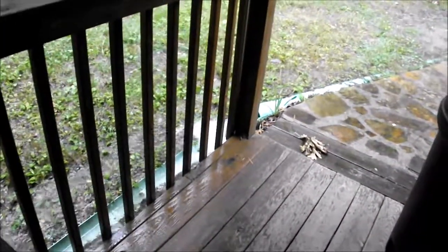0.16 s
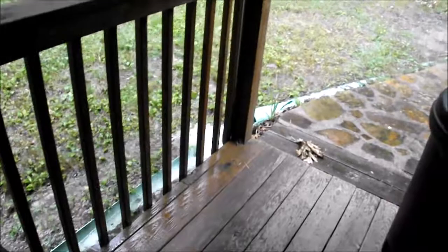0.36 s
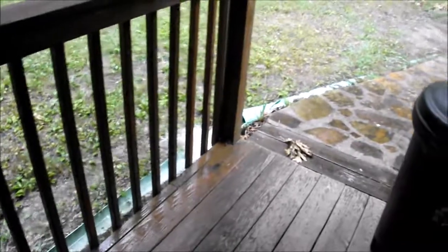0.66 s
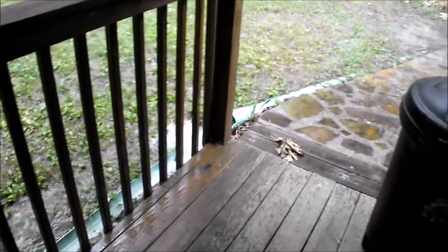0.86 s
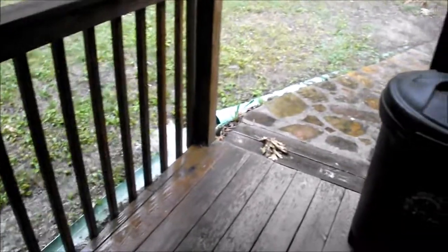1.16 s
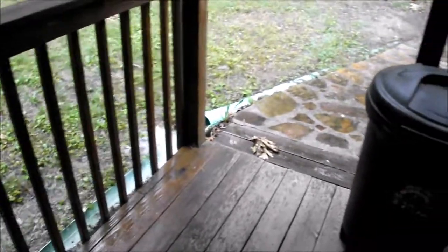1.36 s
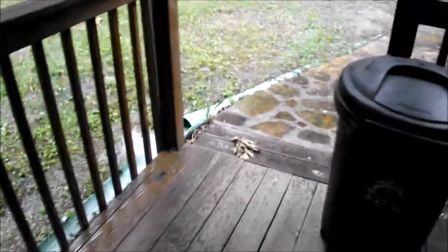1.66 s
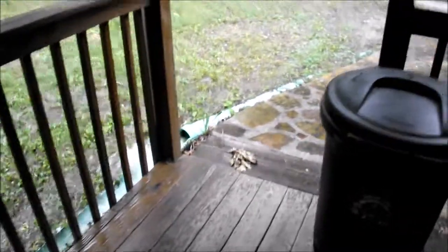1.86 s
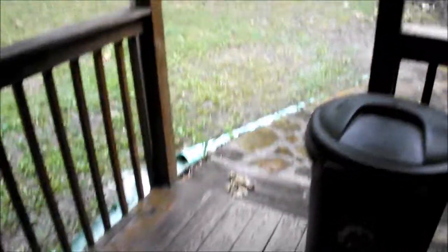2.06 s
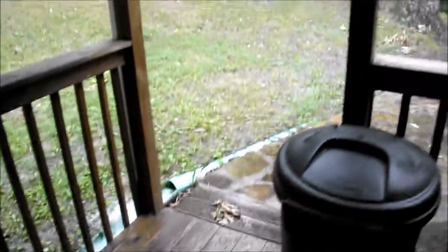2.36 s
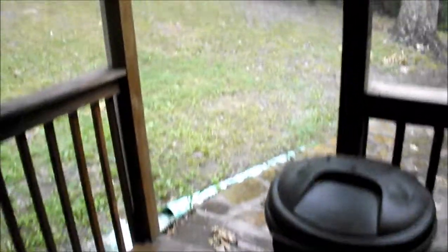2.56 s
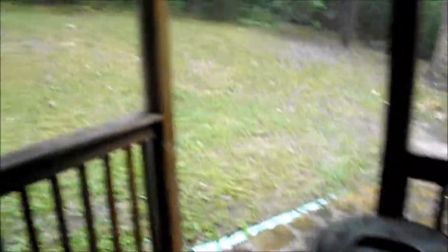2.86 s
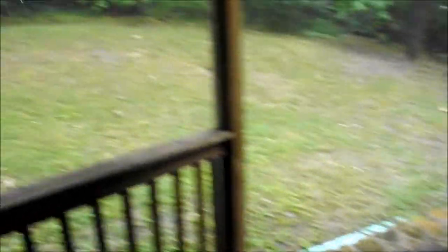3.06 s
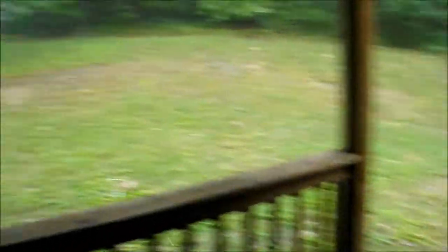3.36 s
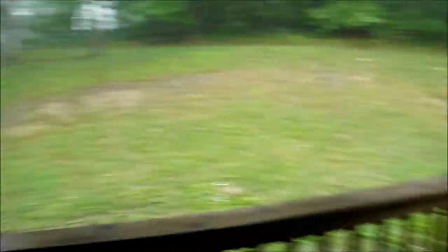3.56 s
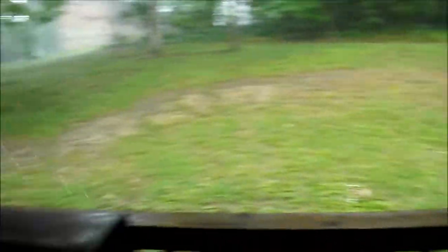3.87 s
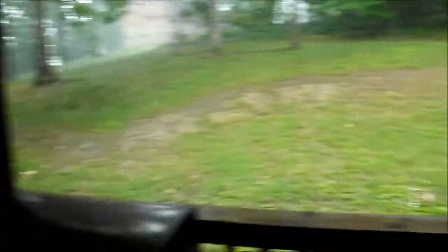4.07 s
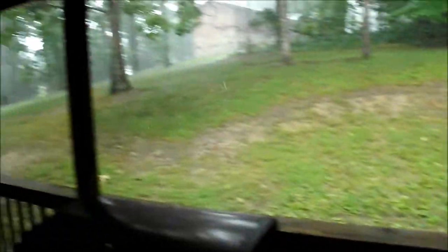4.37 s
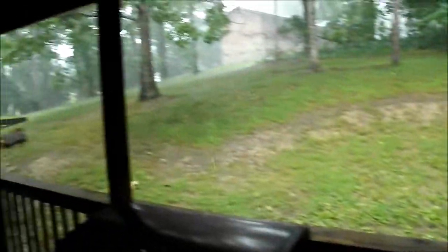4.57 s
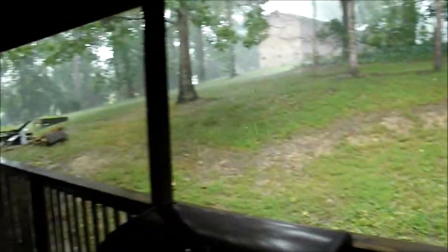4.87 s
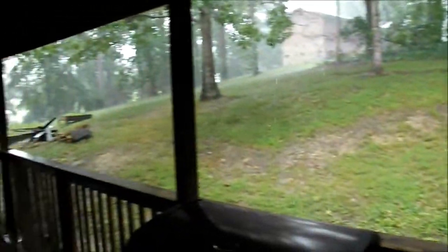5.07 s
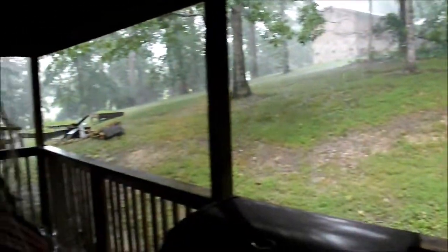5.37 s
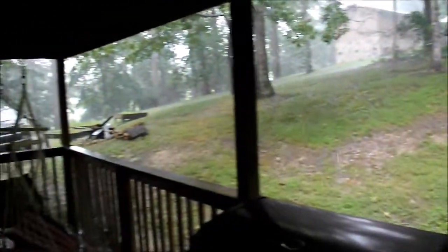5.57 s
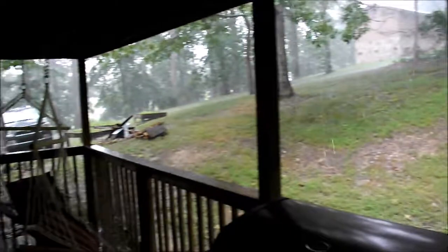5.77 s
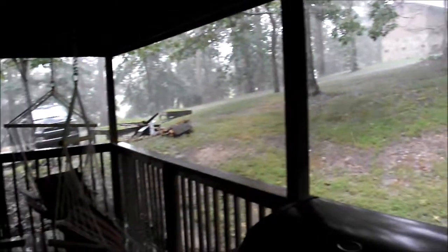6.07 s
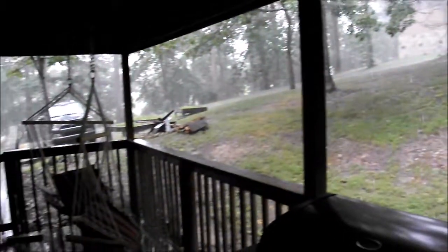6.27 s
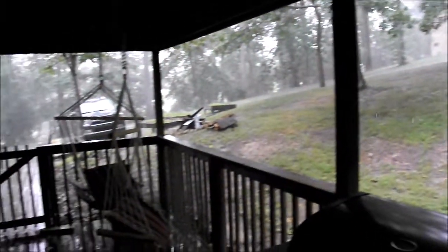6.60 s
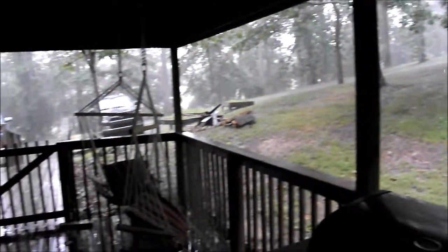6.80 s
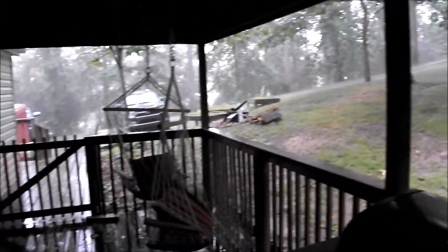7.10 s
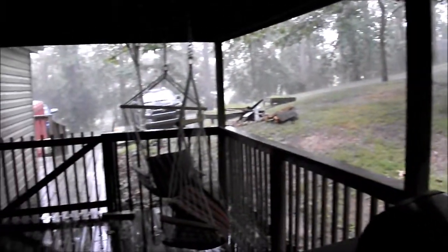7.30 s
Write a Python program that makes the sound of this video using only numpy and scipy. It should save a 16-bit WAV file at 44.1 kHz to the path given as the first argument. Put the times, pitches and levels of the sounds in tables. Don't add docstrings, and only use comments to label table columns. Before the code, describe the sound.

A dense downpour heard from a covered porch: constant harsh hiss, irregular dull drop smacks, rapid level dips, and occasional deep wind bumps.

```python
import sys
import numpy as np
from scipy import signal
from scipy.fft import rfft, irfft
from scipy.io import wavfile

SR = 44100
rng = np.random.default_rng(int(sys.argv[2]) if len(sys.argv) > 2 else 0)


def attenuation_scalar(level_db):
    decades = np.asarray(level_db, float) / 20
    return 10 ** decades


def dump(signal):
    limited = np.clip(np.atleast_2d(signal).T, -1, 1)
    pcm = np.round(limited * 32767).astype(np.int16)
    wavfile.write(sys.argv[1], SR, pcm)


N = 328104


def rms_one(x):
    return x / np.sqrt(np.mean(x ** 2) + 1e-20)


def colour(x, spectrum):
    hz = np.maximum(np.arange(N // 2 + 1) * SR / N, 1)
    point_hz, point_db = np.transpose(spectrum)
    gain_db = np.interp(np.log(hz), np.log(point_hz), point_db)
    return irfft(rfft(x) * attenuation_scalar(gain_db), N)


def band_pass(x, low_hz, high_hz):
    return signal.sosfilt(signal.butter(2, [low_hz, high_hz], "band", fs=SR, output="sos"), x)


def drift(rate_hz):
    r = np.exp(-2 * np.pi * rate_hz / SR)
    noise = rng.standard_normal(N + SR)
    return rms_one(signal.lfilter([1], [1, -2 * r, r * r], noise)[SR:])


def port(x, ring_hz=3234, width_hz=409):
    r = np.exp(-np.pi * width_hz / SR)
    w = 2 * np.pi * ring_hz / SR
    poles = [1, -2 * r * np.cos(w), r * r]
    return signal.lfilter([sum(poles)], poles, x)


# (time of the height [s], rumble level [dB])
WIND_GUSTS = [(0.23, -42), (0.62, -36), (0.89, -47), (2.26, -39), (2.88, -33), (3.2, -28), (3.42, -29),
              (3.65, -38), (3.91, -19.5), (4.08, -20.5), (4.48, -25), (4.62, -30), (4.8, -31), (5.0, -32),
              (5.3, -35), (5.8, -43), (6.05, -38), (6.27, -25), (6.46, -27), (6.76, -37), (7.42, -23)]


def wind(corner_hz=30, lumpy_db=3.0, breeze_db=-42, rise_db_per_s=150, fall_db_per_s=135):
    t = np.arange(0, N, 64) / SR
    s, height_db = np.transpose(WIND_GUSTS)[:, :, None]
    below_height_db = np.maximum(rise_db_per_s * (s - t), fall_db_per_s * (t - s))
    strongest_gust = attenuation_scalar(height_db - below_height_db).max(axis=0)
    strength = np.interp(np.arange(N) / SR, t, attenuation_scalar(breeze_db) + strongest_gust)
    push = band_pass(rng.standard_normal(N + SR), 8, corner_hz)[SR:]
    return strength * attenuation_scalar(lumpy_db * drift(12) - 3.5) * rms_one(push)


# (time [s], peak level [dB])
RAIL_SPLASHES = [
    (0.6884, -30),
    (1.7894, -25),
    (0.2, -30),
    (5.568, -40),
    (5.6396, -21),
    (5.7844, -38),
    (7.1866, -19),
]


def splashes(burst_s=.0002):
    length = 200
    fade = np.exp(-np.arange(length) / (burst_s * SR))
    ticks = np.zeros(N + length)
    for s, peak_db in RAIL_SPLASHES:
        at = round(s * SR)
        burst = rms_one(rng.standard_normal(length) * fade)
        ticks[at:at + length] += attenuation_scalar(peak_db + 16) * burst
    return signal.sosfilt(signal.butter(2, 10500, "high", fs=SR, output="sos"), ticks[:N])


# (time [s], peak level [dB], gain duck [dB])
NEAR_DROPS = [(0.073, -1, 5), (0.568, -5, 4), (0.761, -1, 5), (1.044, -1.5, 3), (1.186, -5, 3.5),
              (1.313, -4, 6), (1.44, -4, 4), (1.794, 0, 4.7), (0.859, 0, -4), (1.96, -5, 4),
              (2.406, -2, 4.3), (2.655, -23, 7.5), (2.913, 0.5, 6), (3.003, -23, 5.5), (3.185, -7, 5),
              (3.608, -16, 4.5), (4.191, -6, 3), (4.337, 0, 3.5), (4.57, -7, 5.5), (4.733, -2, 6.5),
              (4.886, -12, 7), (5.198, -0.5, 5.5), (5.5686, -0.5, 5.5), (5.6407, 1, 7), (5.788, -2, 5.5),
              (6.083, -6, 4.5), (6.18, -4, 6.5), (6.67, -7, 7), (7.256, -5, 6.5), (7.362, -9, 4)]


def big_drops(low_hz=2400, high_hz=4800):
    s, peak_db, _ = np.transpose(NEAR_DROPS)
    smacks = np.full(N, 1e-18)
    at = ((s - .0008) * SR).astype(int)
    smacks[at] = attenuation_scalar(peak_db + 10) * rng.choice([-1, 1], len(s))
    return band_pass(smacks, low_hz, high_hz)


# (frequency [Hz], level per Hz [dB])
RAIN_TONE = [(20, -3), (70, -1.5), (330, -4), (700, -1.5), (1500, -1.5), (3000, 0.5), (5000, 3),
             (5700, 0.75), (7000, 3.5), (10000, -1), (11500, -9), (14300, -11.5), (16000, -4)]
# (time [s], level [dB])
HISS_SWELLS = [(0, -1), (0.2, 3.5), (0.45, 0), (0.7, 1.5), (1.0, 0), (1.75, 1), (2.3, 0), (2.87, 0.5),
               (3.3, 0.5), (4.15, -1), (4.3, -0.5), (5.05, 3), (5.4, 0), (6.0, -.5), (6.55, 1.5),
               (6.9, -0.5), (7.2, 3.5), (7.4, 0.5)]


def rain(drops_per_s=1500, spread_db=3.5, waver_db=1.0, level_db=-22.5, patter_db=-5.5):
    sizes = attenuation_scalar(spread_db * np.minimum(rng.exponential(1, N), 5)) * rng.choice([-1, 1], N)
    ticks = sizes * (rng.random(N) < drops_per_s / SR)
    blur = rng.standard_normal(N)
    fall = rms_one(colour(blur + attenuation_scalar(patter_db) * rms_one(ticks), RAIN_TONE))
    swell_db = np.interp(np.arange(N) / SR, *np.transpose(HISS_SWELLS))
    return attenuation_scalar(level_db + swell_db + waver_db * drift(20.5)) * fall


def automatic_gain(hiss, full_gain_db=3.4, trip_db=-8.5, pull_share=0.47, recovery_db_per_s=44, duck_s=.005):
    s, _, duck_db = np.transpose(NEAR_DROPS)
    hiss_db = 20 * np.log10(np.abs(hiss) + 1e-9)
    pull_db = pull_share * np.maximum(hiss_db - trip_db, 0)
    pull_db[(s * SR).astype(int)] = duck_db
    climb_db = recovery_db_per_s * np.arange(N) / SR
    held_db = np.maximum.accumulate(pull_db + climb_db) - climb_db
    r = np.exp(-1 / (duck_s * SR))
    return attenuation_scalar(full_gain_db - signal.lfilter([1 - r], [1, -r], held_db))


def scene():
    hiss = port(rain())
    drops = port(big_drops() + splashes())
    heard = automatic_gain(hiss) * hiss + drops + wind()
    return np.array([heard, heard])


def band_limit(x):
    return signal.sosfilt(signal.butter(12, 15630, fs=SR, output="sos"), x)


def record(dry):
    top = 1.25
    rounded = top * np.tanh(dry / top)
    late = np.r_[0, rounded[0, :-1]]
    return band_limit(np.array([late, rounded[1]]))


dry = scene()
out = record(dry)
dump(out)
```